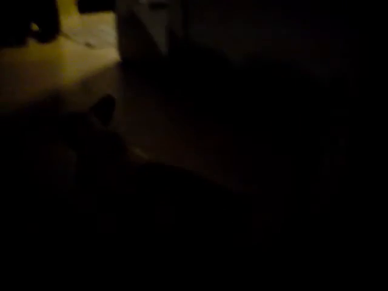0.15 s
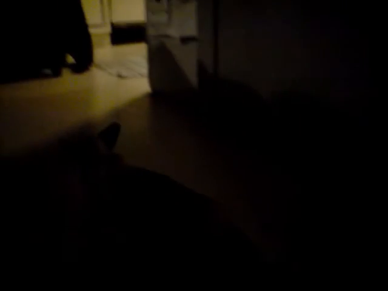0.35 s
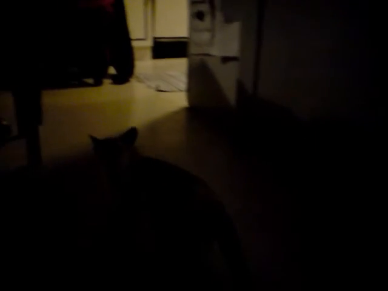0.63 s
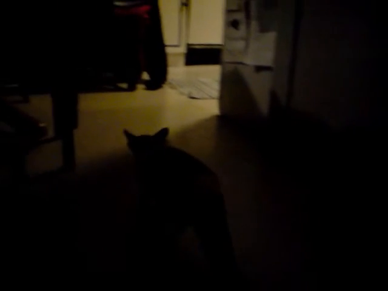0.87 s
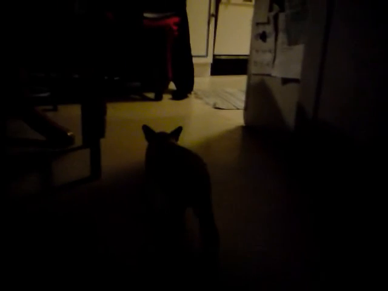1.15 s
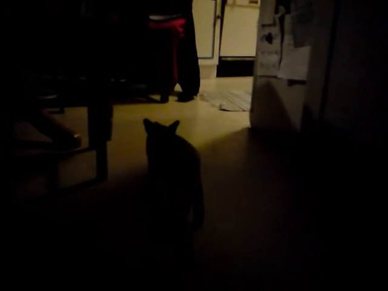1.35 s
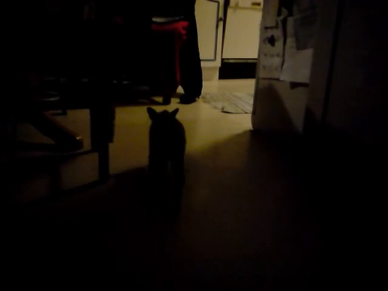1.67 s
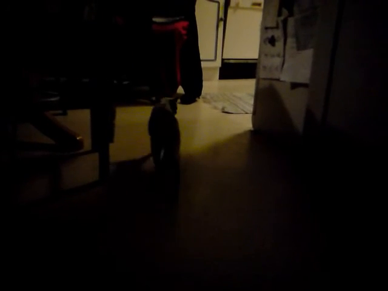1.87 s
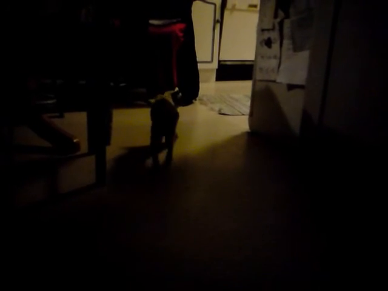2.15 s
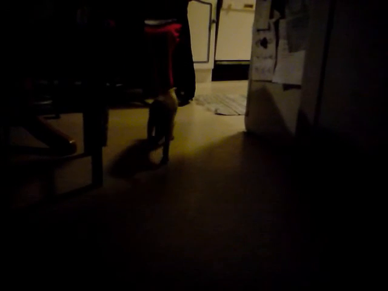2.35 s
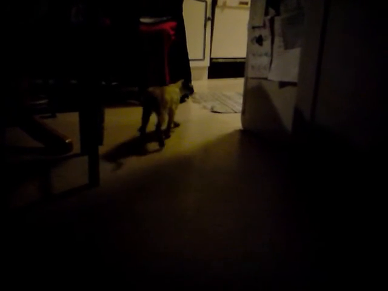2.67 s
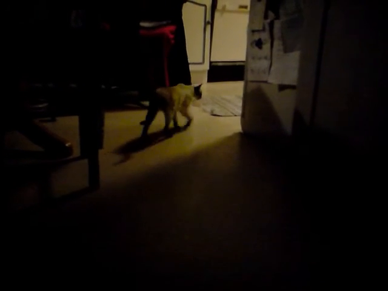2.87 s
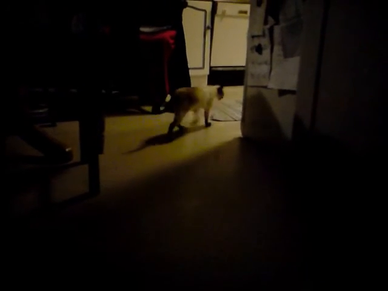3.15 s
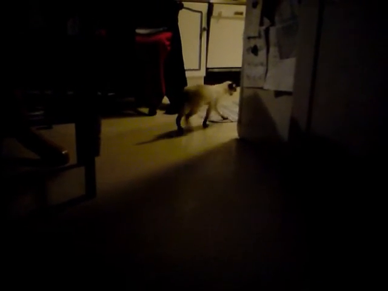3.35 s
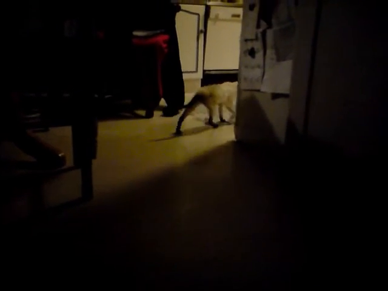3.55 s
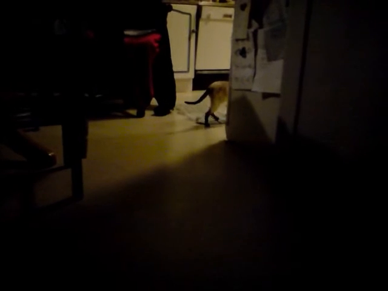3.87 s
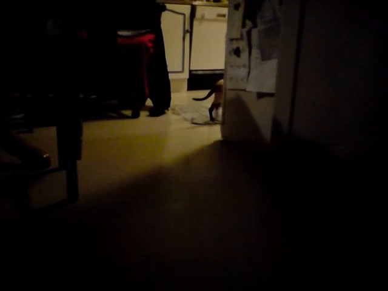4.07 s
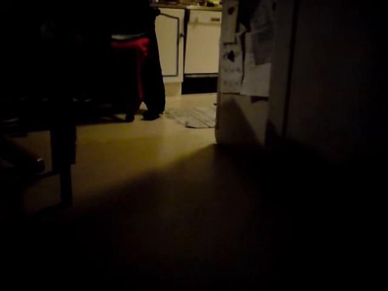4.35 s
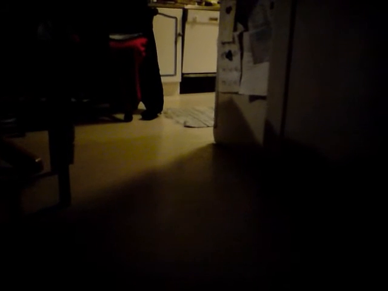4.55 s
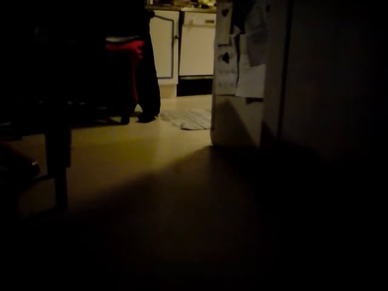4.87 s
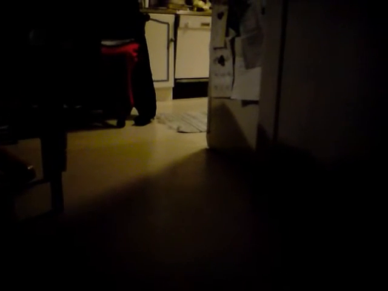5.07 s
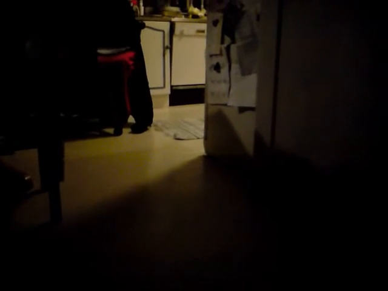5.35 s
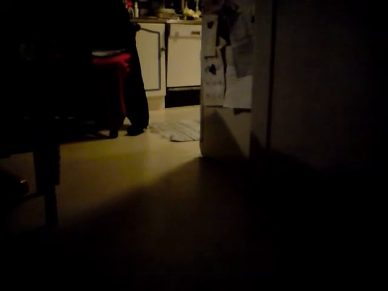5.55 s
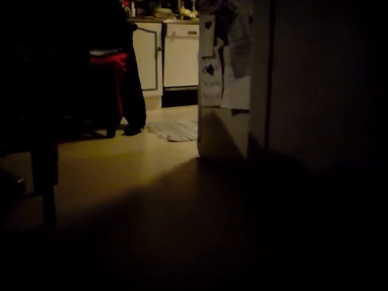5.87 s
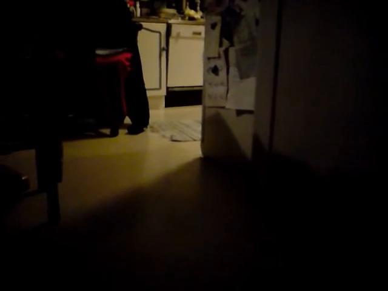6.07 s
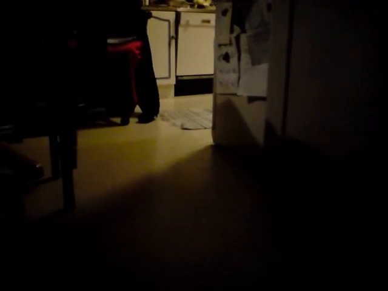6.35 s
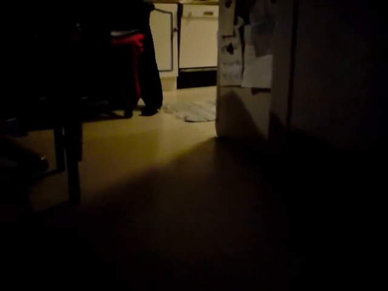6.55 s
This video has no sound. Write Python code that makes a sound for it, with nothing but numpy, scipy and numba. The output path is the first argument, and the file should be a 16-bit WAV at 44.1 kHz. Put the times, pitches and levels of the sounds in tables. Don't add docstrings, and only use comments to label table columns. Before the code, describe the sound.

Murmur-led cat yowls, first loud and close, then rougher and farther across a hard floor, with tiny claw ticks over steady hiss.

```python
import sys
import numpy as np
from scipy import signal
from scipy.fft import rfft, irfft
from scipy.io import wavfile
from scipy.ndimage import uniform_filter1d
from numba import njit

SR = 44100
rng = np.random.default_rng(int(sys.argv[2]) if len(sys.argv) > 2 else 0)


def wav_out(sig):
    wavfile.write(sys.argv[1], SR, np.round(np.clip(np.atleast_2d(sig).T, -1, 1) * 32767).astype(np.int16))


def level_to_linear(level):
    exponent = np.asarray(level, float) / 20
    return 10 ** exponent


N = 295911

# start_s, pitch_hz, level_db, jaw_resonance_hz, lips_open (0-1)
YOWL_1 = [
    [(0, 204.5, -33, 990, 0.08), (.04, 202.4, -50.5, 1020, 0.05), (.17, 193.7, -48, 840, 0.09),
     (.225, 194.3, -50, 790, 0.04)],
    [(.24, 197.5, -39.5, 1700, 0.16), (.305, 182.4, -26.5, 1500, 0.57), (.39, 221.7, -17.5, 1810, 0.92),
     (.46, 250.2, -17.5, 1916, 0.89), (.522, 274.6, -18, 1804, 0.83), (.6, 246.3, -21.5, 1664, 0.71),
     (.75, 200.1, -38, 1158, 0.5), (.86, 161.4, -56, 845, 0.23), (.97, 159, -94, 750, 0.7)],
]
YOWL_2 = [
    [(1.5, 238.7, -83, 980, 0.07), (1.62, 203.8, -70, 823.4, .1), (1.694, 200.1, -52, 809, .1),
     (1.785, 193.4, -69, 890, 0.093), (1.806, 207.2, -38, 1538, 0.1), (1.85, 200.5, -56, 1675, .12),
     (1.99, 206.1, -47.5, 1566, 0.095)],
    [(2.04, 167.1, -34, 1367, 0.391), (2.11, 179, -33.5, 1411, 0.62), (2.17, 208.5, -25.5, 1750, .74),
     (2.255, 256.6, -25, 1836, 0.84), (2.31, 258.3, -25, 1447, 0.62), (2.495, 242, -30, 1247, .52),
     (2.53, 195.7, -37, 794, 0.35), (2.575, 171, -56, 694.4, .4), (2.65, 167.7, -83, 695, .38)],
]
YOWL_3 = [
    [(3.18, 239.3, -94, 876, 0.13), (3.276, 225.8, -66, 1526, 0.1), (3.31, 224.6, -39.5, 1534, .1),
     (3.355, 195.3, -43, 1511, 0.14)],
    [(3.365, 178.8, -30.5, 1352, .3), (3.39, 173, -38, 1346, 0.46), (3.44, 206.5, -26, 1655, 1),
     (3.5, 249.5, -25.5, 1632, 0.93), (3.57, 286.4, -24.5, 1677, 0.8), (3.718, 280.8, -30, 1427, 0.65),
     (3.81, 305.6, -31, 1275, 0.48), (3.872, 204, -43, 887, .42), (3.98, 195, -84, 831.6, 0.44)],
]
YOWL_4 = [
    [(4.62, 195, -85, 984, 0.029), (4.8, 189.4, -75.5, 982, .03), (4.88, 182, -69, 1500, 0.031),
     (5.024, 184.8, -58, 1509, 0.027), (5.124, 214.8, -47.5, 1455, 0.044)],
    [(5.16, 213.3, -45.5, 1370, 0.29), (5.25, 204.1, -35, 1500, 0.72), (5.35, 293.6, -29, 1607, 0.65),
     (5.45, 281, -30.5, 1474, 0.67), (5.56, 243.6, -33, 1544, .69), (5.66, 240.5, -39.5, 1452, .6),
     (5.71, 239.7, -38.5, 1021, 0.46), (5.76, 186.2, -52.5, 770, 0.32), (5.86, 181, -102, 737, .36)],
]
YOWL_5 = [
    [(6.46, 211.4, -76, 1100, 0.22), (6.55, 203.5, -81, 993, 0.18), (6.628, 211.8, -54, 1490, 0.265),
     (6.71, 205.9, -43.5, 1217, .45)],
]
# start_s, end_s, lips_shut_db, lips_open_db
THROAT_HUMS = [
    (-.05, 0.864, -38.5, -50.5),
    (1.558, 2.49, -53, -54),
    (3.251, 3.837, -50.5, -56.5),
    (4.675, 5.689, -60.5, -56),
    (6.542, 6.661, -46, -70),
]
# time_s, roughness (0-1), room_db
WALK_AWAY = [(0, .3, 2), (.16, .12, -3), (.3, .2, -6), (.8, .24, -6), (2.3, .43, -2), (3.6, .66, 0),
             (5.4, .6, 2), (6.7, .6, 2)]
# frequency_hz, density_db (per Hz)
HISS_COLOUR = [(20, -23.5), (60, -16), (125, -11.5), (250, -5.5), (400, -2), (600, -1), (1000, -1),
               (2000, -4), (4000, -7), (7000, -10.5), (9500, -12), (11000, -12.5)]
# start_s, peak_db, pitch_hz, t60_s
CLAW_LIP_TICKS = [(1.2692, -46, 4500, .006), (1.2842, -42, 4500, .006), (1.2866, -43, 3800, .008),
                  (1.66, -48, 4200, .01), (1.6876, -43, 4200, .025), (2.7814, -46, 2700, .02),
                  (3.1482, -45, 2600, .025), (6.4448, -40, 1200, .045)]

THROAT_HZ, THROAT_WIDTH_HZ = 415, 280
MOUTH_WIDTH_HZ, TONGUE_WIDTH_HZ, FRONT_WIDTH_HZ, SKIRT_WIDTH_HZ = 190, 260, 800, 1450
TONGUE_SHUT_HZ, TONGUE_OPEN_HZ, FRONT_ABOVE_TONGUE_HZ = 1708, 3488, 1830
TONGUE_DB, TONGUE_MUFFLE_DB, TONGUE_CLOSING_DB, FRONT_DB = -4.5, -29, -4, -20.5
LIPS_PARTED = 0.408
JAW_CLOSING_START_HZ, JAW_CLOSING_END_HZ = 1500, 1100
FRONT_LIFT_HZ, FRONT_LIFT_DB = 750, 4.5
HUM_ATTACK_DB_PER_S, HUM_RELEASE_DB_PER_S = 295, 199
SHUT_ROUGHENS, ROUGHEST = 4.0, 1.0
DOUBLING_DB, DOUBLING_FROM = 4.0, 0.75
ROOM_T60_S, FIRST_ECHO_S, WALL_CUT_HZ = 0.42, 0.0046, 4300
MIC_LOW_CUT_HZ, HISS_DB = 410, -59.5
STARVE_HIGH_DB, STARVE_LOW_DB, STARVE_SPREAD_DB = -34, -33.5, 5
SPARED_FROM_HZ, SPARED_TO_HZ, SPARED_DB = 161.4, 7470, -24.5
MIRROR_DB, CUTOFF_HZ = -2, 15700


def rms_one(x):
    return x / np.sqrt(np.mean(x ** 2) + 1e-20)


def evened(x):
    return x / np.sqrt(uniform_filter1d(x ** 2, size=1800) + 1e-12)


def in_time(rows):
    rows = np.asarray(rows)
    return [np.interp(np.arange(N) / SR, rows[:, 0], column) for column in rows.T[1:]]


def drift(rate_hz):
    r = np.exp(-2 * np.pi * rate_hz / SR)
    noise = rng.standard_normal(N + SR)
    return rms_one(signal.lfilter([1], [1, -2 * r, r * r], noise)[SR:])


@njit
def resonate(x, hz, width_hz, sr):
    r = np.exp(-np.pi * width_hz / sr)
    out = np.zeros(len(x))
    for i in range(2, len(x)):
        feedback = 2 * r * np.cos(2 * np.pi * hz[i] / sr) * out[i - 1] - r * r * out[i - 2]
        out[i] = x[i] - x[i - 2] + feedback
    return out


def vocal_folds(pitch_hz, rough, jitter=.011, waver=.017, shimmer_db=4.0, breath=2.0):
    uneven = 1 + rough * (jitter * drift(120) + waver * drift(18))
    turns = np.cumsum(pitch_hz * uneven) / SR
    pulses = sum(np.cos(2 * np.pi * k * turns) for k in range(1, 36)) / 4
    cycle = np.round(turns)
    shimmer = shimmer_db * rough * rng.standard_normal(size=3000)[cycle.astype(int)]
    doubling = DOUBLING_DB * np.clip((rough - DOUBLING_FROM) / 0.11, 0, 1) * (-1) ** cycle
    gate = .5 + .5 * np.cos(2 * np.pi * turns)
    air = breath * rough ** 2 * gate * rng.standard_normal(N)
    return level_to_linear(shimmer + doubling) * pulses + air


def throat_hum_db(shut):
    t = np.arange(N) / SR
    levels = []
    for start, end, shut_db, open_db in THROAT_HUMS:
        held = open_db + (shut_db - open_db) * shut
        attack = np.minimum(0, HUM_ATTACK_DB_PER_S * (t - start))
        release = np.maximum(0, HUM_RELEASE_DB_PER_S * (t - end))
        levels.append(held + attack - release)
    return np.max(levels, axis=0)


def cat(hoarse):
    calls = np.concatenate(YOWL_1 + YOWL_2 + YOWL_3 + YOWL_4 + YOWL_5)
    pitch_hz, mouth_db, mouth_hz, lips = uniform_filter1d(in_time(calls), size=600, axis=1)
    shut = np.clip(1 - lips / LIPS_PARTED, 0, 1)
    jaw_fall = (JAW_CLOSING_START_HZ - mouth_hz) / (JAW_CLOSING_START_HZ - JAW_CLOSING_END_HZ)
    closing = (1 - shut) * np.clip(jaw_fall, 0, 1)

    throat_hz = np.full(N, float(THROAT_HZ))
    tongue_hz = TONGUE_SHUT_HZ + (TONGUE_OPEN_HZ - TONGUE_SHUT_HZ) * lips
    front_hz = np.maximum(tongue_hz, 2700) + FRONT_ABOVE_TONGUE_HZ + FRONT_LIFT_HZ * closing
    tongue_db = mouth_db + TONGUE_DB + TONGUE_MUFFLE_DB * shut + TONGUE_CLOSING_DB * closing
    front_db = mouth_db + FRONT_DB + FRONT_LIFT_DB * closing

    source = vocal_folds(pitch_hz, np.minimum(hoarse * (1 + SHUT_ROUGHENS * shut), ROUGHEST))
    airy = source + 2.2 * rng.standard_normal(N)
    tract = [(source, throat_hz, THROAT_WIDTH_HZ, throat_hum_db(shut)),
             (source, mouth_hz, MOUTH_WIDTH_HZ, mouth_db),
             (source, tongue_hz, TONGUE_WIDTH_HZ, tongue_db),
             (airy, front_hz, FRONT_WIDTH_HZ, front_db)]
    voice = 0
    for k, (drive, hz, width_hz, db) in enumerate(tract):
        peak = resonate(drive, hz, float(width_hz), SR)
        on_skirt = resonate(peak, hz, float(max(SKIRT_WIDTH_HZ, 2 * width_hz)), SR)
        level = level_to_linear(db - 1.0 + 2.27 * drift(17))
        voice = voice + (-1) ** k * level * evened(on_skirt)
    return voice


def room(x):
    hz, t, tail = signal.stft(rng.standard_normal(SR // 2), SR, nperseg=256)
    tail *= level_to_linear(-60 * t * (1 + hz[:, None] / WALL_CUT_HZ) / ROOM_T60_S)
    echo = signal.istft(tail, SR, nperseg=256)[1]
    echo[:round(FIRST_ECHO_S * SR)] = 0
    return signal.fftconvolve(x, echo / np.linalg.norm(echo))[:N]


def hiss():
    hz = np.arange(1, N // 2 + 2) * SR / N
    point_hz, point_db = np.array(HISS_COLOUR).T
    colour = level_to_linear(np.interp(np.log(hz), np.log(point_hz), point_db)) * (hz < SR / 4)
    return level_to_linear(HISS_DB) * rms_one(irfft(rfft(rng.standard_normal(N)) * colour, N))


def ticks():
    size = 2000
    out = np.zeros(N + size)
    t = np.arange(size) / SR
    for start_s, peak_db, hz, t60_s in CLAW_LIP_TICKS:
        band = signal.butter(2, [hz / 1.7, hz * 1.7], "band", fs=SR, output="sos")
        burst = signal.sosfilt(band, rng.standard_normal(size) * level_to_linear(-60 * t / t60_s))
        start = round(start_s * SR)
        out[start:start + size] += level_to_linear(peak_db) * burst / np.abs(burst).max()
    return out[:N]


def scene():
    rough, room_db = in_time(WALK_AWAY)
    mic = signal.butter(2, MIC_LOW_CUT_HZ, "high", fs=SR, output="sos")
    near = signal.sosfilt(mic, cat(rough))
    wet = level_to_linear(room_db)
    in_room = (near + room(wet * near)) / np.sqrt(1 + wet ** 2)
    return (in_room + ticks() + hiss())[None]


def starve(x):
    frame = dict(fs=SR, nperseg=2048, noverlap=1024, window="cosine")
    hz, _, frames = signal.stft(x, **frame)
    power = np.abs(frames) ** 2
    loud = power[hz < 6000].mean(axis=0)
    low_edges = [0, 45, 90, 130, 175, 215, 260, 300]
    high_edges = list(range(6000, 11500, 350))
    bands = list(zip(low_edges[:-1], low_edges[1:])) + list(zip(high_edges[:-1], high_edges[1:]))
    for low, high in bands:
        band = (hz >= low) & (hz < high)
        below_db = 10 * np.log10(power[band].mean(axis=0) / loud + 1e-12)
        limit_db = STARVE_LOW_DB if low < 300 else STARVE_HIGH_DB
        if SPARED_FROM_HZ <= low < SPARED_TO_HZ:
            limit_db = limit_db + SPARED_DB
        limit_db = limit_db + STARVE_SPREAD_DB * rng.standard_normal(len(loud))
        kept = 1 / (1 + np.exp(np.clip(2 * (limit_db - below_db), -30, 30)))
        frames[band] *= .01 + .99 * kept
    return signal.istft(frames, **frame)[1][:N]


def band_limit(x):
    return signal.sosfilt(signal.butter(12, 17040, fs=SR, output="sos"), x)


def record(dry):
    half_band = signal.butter(16, SR / 4.02, fs=SR, output="sos")
    half = starve(signal.sosfiltfilt(half_band, dry[0]))
    mirror = half * (-1) ** np.arange(N)
    top_cut = signal.ellip(14, .5, 70, CUTOFF_HZ, fs=SR, output="sos")
    both = signal.sosfilt(top_cut, half + level_to_linear(MIRROR_DB) * mirror)
    return band_limit(both[None])


dry = scene()
out = record(dry)
wav_out(out)
```